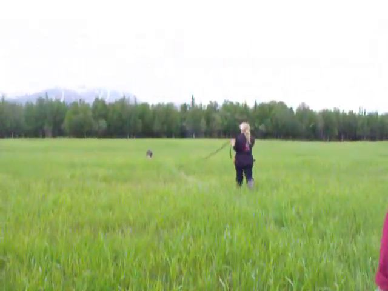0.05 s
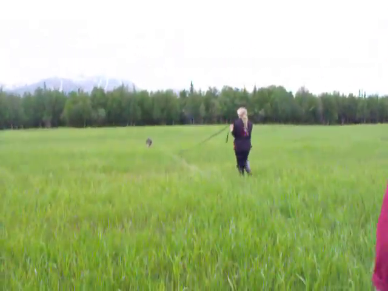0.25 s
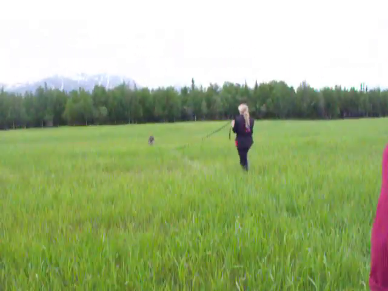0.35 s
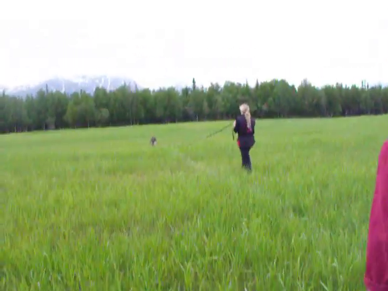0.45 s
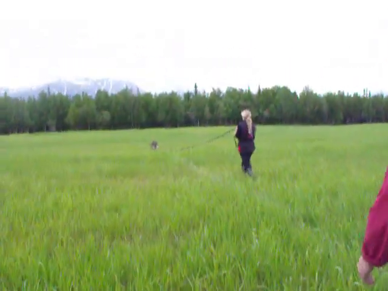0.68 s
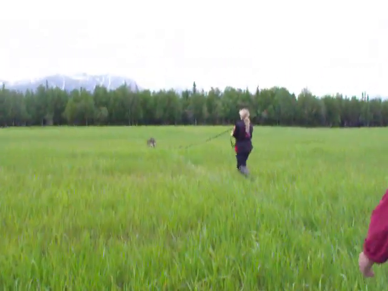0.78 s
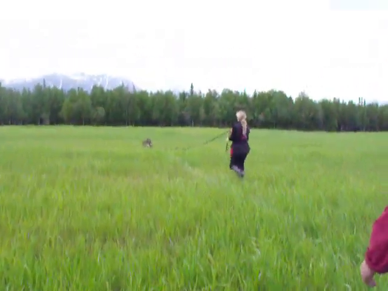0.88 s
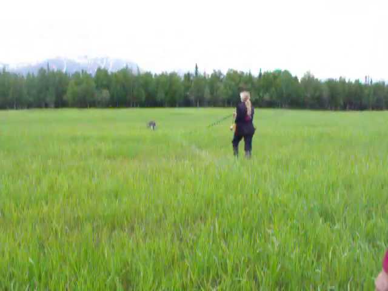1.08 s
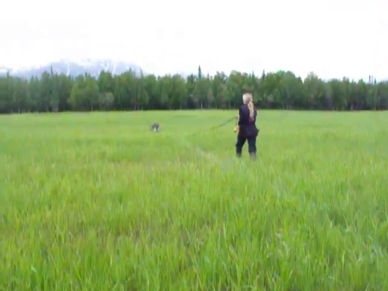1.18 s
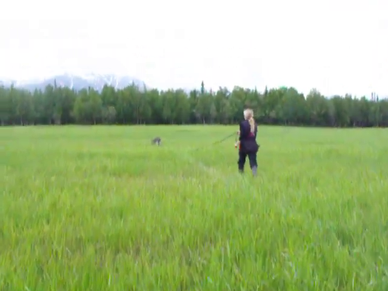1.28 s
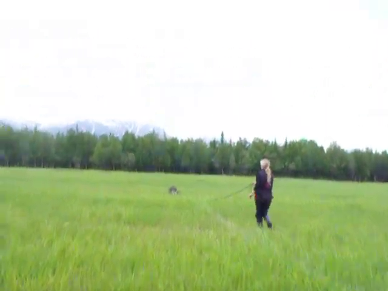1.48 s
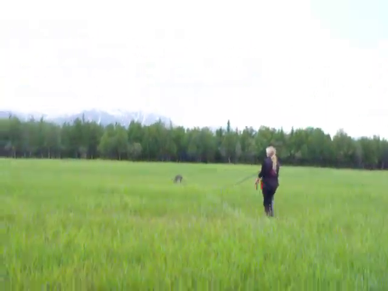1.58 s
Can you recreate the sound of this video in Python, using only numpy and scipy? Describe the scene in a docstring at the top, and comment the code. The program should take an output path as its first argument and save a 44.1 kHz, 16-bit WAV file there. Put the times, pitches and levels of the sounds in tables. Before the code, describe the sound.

Sharp, very close clicks and rubbing on a camera's plastic case come in bursts: loud from 0.25 to 0.4 seconds and again around 0.5, lighter from 0.95 to 1.2. Tall grass swishes quietly throughout, with light air nudging the microphone. Soft footfalls land at about 0.7 and 1.2 seconds. From 1.25 a distant bird sings four faint falling whistles, and one last click comes near 1.6.

```python
"""A walk through tall grass in an open field, heard from the microphone of a hand-held camera.
Grass swishes and air nudges the microphone throughout. With each stride something rubs on the camera:
bursts of stick-slip clicks ring its plastic case at point-blank range, and the hardest overload the
recorder. A soft footfall comes between bursts and another after them. Toward the end a far bird
sings four falling whistles, and the case clicks once more."""
import sys
import numpy as np
from scipy import signal
from scipy.fft import rfft, irfft, next_fast_len
from scipy.io import wavfile
from scipy.ndimage import map_coordinates

SR = 44100
rng = np.random.default_rng(int(sys.argv[2]) if len(sys.argv) > 2 else 0)


def file_out(sig):
    """Save sig as 16-bit WAV at sys.argv[1]."""
    # one column per channel
    cols = np.atleast_2d(sig).T
    # limit, then scale
    lim = np.clip(cols, -1, 1)
    pcm = np.round(lim * 32767).astype(np.int16)
    wavfile.write(sys.argv[1], SR, pcm)


N = 72765


def amp(db):
    """Decibels to gain."""
    return 10 ** (np.asarray(db) / 20)


def unit(x):
    """Scale to rms 1."""
    return x / np.sqrt(np.mean(x ** 2) + 1e-20)


def peaked(x):
    """Scale to peak 1."""
    return x / np.abs(x).max()


def filtered(x, response):
    """Multiply the spectrum of x by response(hz)."""
    size = next_fast_len(len(x) + len(x) // 4)
    return irfft(rfft(x, size) * response(np.fft.rfftfreq(size, 1 / SR)), size)[:len(x)]


def coloured(x, points):
    """x shaped by (freq_hz, gain_db) points on a log axis, at rms 1."""
    freq_hz, gain_db = np.transpose(points)
    return unit(filtered(x, lambda hz: amp(np.interp(np.log(hz + 1), np.log(freq_hz), gain_db))))


def wobble(per_s):
    """A smooth random curve with per_s knots a second."""
    knots = rng.standard_normal(int(N * per_s / SR) + 4)
    return map_coordinates(knots, [np.arange(N) * per_s / SR])


def grains(per_s):
    """Tiny random jolts, about per_s a second, at rms 1."""
    return unit(rng.standard_normal(N) * (rng.random(N) < per_s / SR))


def add(track, start_s, x):
    """Mix x into the track at start_s."""
    part = track[round(start_s * SR):][:len(x)]
    part += x[:len(part)]


def air():
    """Open air murmurs over the field, and low puffs push on the microphone."""
    # spectrum of the murmur: freq_hz, gain_db
    murmur_colour = [(20, 0.5), (60, -6.5), (115, -9), (170, -4.5), (220, -6.5), (330, -3), (520, -4),
                     (800, -12.5), (1500, -22.5), (6000, -33.5)]
    # puffs on the microphone: centre_s, half_length_s, level_db
    puffs = [(.222, .02, -34.5), (0.497, .012, -48), (1.215, 0.021, -47.5), (1.424, 0.014, -42.5),
             (1.6, 0.037, -43)]
    # spectrum of the puffs: freq_hz, gain_db
    puff_colour = [(10, -3), (25, 7), (50, -12), (100, -12.5), (300, -50.5), (1000, -74.5)]
    t = np.arange(N) / SR
    murmur_db = -44.5 + 0.6 * wobble(per_s=9.3)
    murmur = amp(murmur_db) * coloured(rng.standard_normal(N), murmur_colour)
    swell = sum(amp(db) * np.exp(-((t - centre_s) / half_s) ** 2) for centre_s, half_s, db in puffs)
    return murmur + swell * coloured(rng.standard_normal(N), puff_colour)


def bird():
    """A far bird's thin whistles fall fast and level out, smeared on their way across the field."""
    # the song: start_s, length_s, start_hz, end_hz, level_db
    whistles = [(1.255, 0.044, 5400, 5060, -41.5), (1.34, .055, 5530, 4500, -37.5),
                (1.45, 0.066, 5040, 4400, -41), (1.557, .056, 5460, 4190, -40)]
    bend, waver, echo_s = 1.4, 0.015, 0.016
    song, t = np.zeros(N), np.arange(SR // 8) / SR
    for start_s, length_s, start_hz, end_hz, level_db in whistles:
        progress = np.linspace(0, 1, int(length_s * SR))
        pitch_hz = end_hz + (start_hz - end_hz) * (1 - progress) ** bend
        pitch_hz *= 1 + waver * wobble(per_s=237)[:len(progress)]
        arch = np.sqrt(np.abs(np.sin(np.pi * progress)))
        add(song, start_s, amp(level_db) * arch * np.sin(2 * np.pi * np.cumsum(pitch_hz) / SR))
    echo = rng.standard_normal(len(t)) * np.exp(-t / echo_s)
    return song + signal.fftconvolve(song, echo / np.linalg.norm(echo))[:N]


def grass():
    """Stalks and blades brush the legs below the microphone: a mid-range rustle and a bright hiss."""
    # contour of the swish: time_s, stalk_db, blade_db
    swish = [ [(0.0, -39, -40), (0.294, -43, -42), (0.412, -39.5, -37.5), (0.496, -42, -40.5),
             (0.776, -43.5, -38), (0.992, -41.5, -42), (1.144, -39, -37.5), (1.364, -43, -40),
             (1.65, -40, -42)], ][0]
    # spectrum of the stalks: freq_hz, gain_db
    stalk_colour = [(60, -30), (300, -9.5), (700, 1.5), (1050, 4.5), (1600, -5.5), (2600, -9), (6000, -19)]
    # spectrum of the blades: freq_hz, gain_db
    blade_colour = [(500, -35), (1500, 5), (2400, 0.5), (3300, 1.5), (4100, 2), (5250, 3.5), (5550, -1),
                    (5800, -7.5), (6200, -7)]
    stalk_trim_db, blade_trim_db = -0.5, 1.5
    t = np.arange(N) / SR
    time_s, stalk_db, blade_db = np.transpose(swish)
    stalk_gain = amp(np.interp(t, time_s, stalk_db) + stalk_trim_db + 0.37 * wobble(per_s=39.8))
    stalks = stalk_gain * coloured(grains(per_s=5000), stalk_colour)
    blade_gain = amp(np.interp(t, time_s, blade_db) + blade_trim_db + 0.55 * wobble(per_s=50))
    blades = blade_gain * coloured(grains(per_s=12000), blade_colour)
    return stalks + blades


def footfalls():
    """A soft foot crushes stalks in a short, dull burst of noise."""
    # footfalls: start_s, peak_db
    steps = [(0.7241, -25.5), (1.236, -25)]
    # spectrum of the crush: freq_hz, gain_db
    crush_colour = [(80, -15), (250, 2), (600, -4), (1050, 7.5), (1700, -12.5), (5000, -30)]
    decay_s = 0.0042
    out, t = np.zeros(N), np.arange(SR // 10) / SR
    for start_s, peak_db in steps:
        crush = coloured(rng.standard_normal(len(t)), crush_colour) * np.exp(-t / decay_s)
        add(out, start_s, amp(peak_db) * peaked(crush))
    return out


def case_ring(push, hardness):
    """The plastic case rings; hard contact favours its outer modes, and each contact weights them anew."""
    # modes of the case: pitch_hz, width_hz, gain_db, db_per_hardness
    modes = [(610, 350, -23, 0), (1013, 160, -15, 4), (1665, 280, -14, 2.5), (2114, 200, -8, 5),
             (2452, 222, 3, -3.5), (2857, 234, 6, -6), (3272, 196, 2, 0), (4040, 450, -22, 13),
             (4354, 246, -13, 9.5), (5055, 218, -5, 4.5), (5936, 180, -18, 5.5)]
    pitch_scatter, gain_scatter_db = 0.018, 1.5
    pitch_hz, width_hz, gain_db, db_per_hardness = np.transpose(modes)[:, :, None]
    pitch_draw, gain_draw = rng.standard_normal((2, len(modes), 1))
    pitch_hz = pitch_hz * (1 + pitch_scatter * pitch_draw)
    gain = amp(gain_db + hardness * db_per_hardness + gain_scatter_db * gain_draw)
    polarity = (-1) ** np.arange(len(modes))[:, None]

    def resonances(hz):
        damping = 1j * hz * width_hz
        return np.sum(polarity * gain * damping / (pitch_hz ** 2 - hz ** 2 + damping), axis=0)

    return filtered(push, resonances)


def rubbing():
    """Dense micro-slips keep the case sounding while the contact slides."""
    # slides on the case: start_s, length_s, level_db, hardness
    rubs = [(0.281, 0.049, -27.5, 0.023), (0.33, 0.025, -37.5, .3), (0.388, 0.034, -28, 0),
            (0.489, 0.024, -17.5, 0.49), (0.526, 0.029, -22, 0.12), (0.966, .034, -31.5, 0.27),
            (0.999, 0.071, -27.5, 0.84)]
    fade_s = 0.0024
    out = np.zeros(N)
    for start_s, length_s, level_db, hardness in rubs:
        t = np.arange(int(length_s * SR)) / SR
        pressure = np.clip(np.minimum(t, length_s - t) / fade_s, 0, 1)
        friction = grains(per_s=3100)[:len(t)]
        add(out, start_s, amp(level_db) * pressure * unit(case_ring(friction, hardness)))
    return out


def slips():
    """Each slip jolts the case right at the microphone; hard ones also snap and shove the whole camera."""
    # stick-slip clicks: start_s, level_db, hardness (0 soft, 1 and over hard), chatter_ms
    clicks = [(0.2413, 0, 1.32, 0.59), (.2473, -1, 1.21, 0.52), (0.2494, -9.5, 1.1, .6),
              (0.2539, -13, 0.21, 2.9), (0.2677, -14, 0.18, 1.1), (0.2716, -7.5, 1.1, 0.87),
              (0.2763, -4, 0.46, 1.1), (.2830, -18, .2, 1.5), (0.2883, -13.5, 0.071, 0.66),
              (0.2972, -11, 1.1, 1.4), (0.3023, -6, 0, 3.9), (0.3071, -9.5, 0, 1.2),
              (0.3135, -11.5, 0, 0.76), (0.3162, -12, 0, 2.2), (0.3193, -9.5, 0.15, 0.51),
              (0.3468, -12.5, .7, 1.9), (0.3731, -10, 0, 2.3), (0.39, -5.5, 0, 0.48),
              (0.392, -4.5, 0, 0.83), (.399, -11, 0, 2.2), (0.4029, -1.5, 0, 0.52), (0.407, -9, 0, 0.53),
              (0.411, -19, 0, 4.1), (0.4221, -14, 0, 1.2), (0.491, -19.5, 0.41, 1.6),
              (0.4954, 0.5, 0.93, 4.85), (.5001, -1, 0.55, 3.1), (0.504, -8, 0.56, 1.5),
              (0.5073, -5.5, 0, 3.8), (0.5139, -8.5, 0.57, 2.6), (0.5267, -5, 0.35, 2.1),
              (0.5318, -0.5, 1, 1.4), (0.5353, -6.5, .8, 0.32), (0.5376, 0, 1.1, 0.24),
              (.5402, -5.5, 0.73, 0.29), (0.542, -11, .8, 0.28), (0.544, -1, 0.84, 0.25),
              (0.5481, -12.5, 0.57, 0.84), (0.553, -14, 0.69, 0.6), (0.5571, -10, 1.3, 0.15),
              (0.5612, -16, .7, .2), (0.564, -17.5, .8, 0.17), (0.9634, -2.5, 1.44, 0.48),
              (0.9707, -9.5, 1.16, 0.11), (.9724, -13.5, 1.4, 0.7), (0.976, -13.5, 0.7, 1),
              (0.9854, -10.5, 1.1, 3.1), (1, -15.5, 1.3, 2), (1.0058, -15, 0.91, 1),
              (1.012, -11.5, 1.1, 0.994), (1.0177, -15.5, 0.7, 1.6), (1.02, -29, 0.41, 0.396),
              (1.0275, -15.5, 0.56, 0.69), (1.0313, -16, 0.6, 0.98), (1.0452, -15, .7, 1.5),
              (1.051, -16, .5, 1.9), (1.0543, -13.5, 0.82, 1.8), (1.0751, -10, 0.72, 1),
              (1.0794, -9.5, 0.98, 0.18), (1.109, -19, 0, 2.9), (1.1702, -8.5, 0, 1.84),
              (1.1737, -12, 0.025, 1.6), (1.1799, -11, 1.4, 0.18), (1.184, -15.5, 1.1, 0.49),
              (1.644, -11, 1.4, 1.8)]
    # spectrum of the shoved camera's thud: freq_hz, gain_db
    thud_colour = [(25, -5), (70, -3), (150, -10), (330, -4.5), (480, -4.5), (650, 2), (900, -15.5),
                   (2000, -29.5)]
    chatter_gain, tail_db, tail_s = 0.31, -33, 0.0077  # gains relative to the first jolt
    snap_hz, snap_s = 3800, 0.00014
    thud_db, thud_growth, thud_s = -29.5, 1.8, 0.0068
    out, t = np.zeros(N), np.arange(SR // 32) / SR
    from_peak_s = t - 3 * snap_s
    snap = np.cos(2 * np.pi * snap_hz * from_peak_s) * np.exp(-(from_peak_s / snap_s) ** 2 / 2)
    for start_s, level_db, hardness, chatter_ms in clicks:
        chatter = chatter_gain * rng.standard_normal(len(t)) * np.exp(-(t * 1000 / chatter_ms) ** 2 / 2)
        rub_tail = amp(tail_db) * rng.standard_normal(len(t)) * np.exp(-t / tail_s)
        push = chatter + rub_tail
        push[0] += 1  # the first jolt
        ring = peaked(case_ring(push, hardness))
        snap_share = np.clip(0.43 * hardness / (1 + chatter_ms), 0, 1)  # short, hard slips snap most
        click = peaked((1 - snap_share) * ring + snap_share * snap)
        thud = peaked(coloured(rng.standard_normal(len(t)), thud_colour) * np.exp(-t / thud_s))
        thud_gain = hardness * chatter_ms * amp(thud_db + thud_growth * level_db)
        add(out, start_s, amp(level_db) * click + thud_gain * thud)
    return out


def scene():
    """The field and the camera's own noises meet at one microphone."""
    return (air() + bird() + grass() + footfalls() + rubbing() + slips())[None]


def record(dry):
    """A narrow-band mono recorder that falls away near 6 kHz and clips the loudest peaks."""
    # response of microphone and recorder: freq_hz, gain_db
    response = [(5250, -0.5), (5550, -5), (5850, -4.5), (6050, -16), (6300, -26), (6700, -65),
                (8000, -80.5)]
    overload, top_hz = 0.72, 15900
    narrow = filtered(dry[0], lambda hz: amp(np.interp(hz, *np.transpose(response))))
    clipped = np.clip(narrow, -overload, overload)
    return filtered(clipped, lambda hz: hz < top_hz)[None]


dry = scene()
out = record(dry)
file_out(out)
```